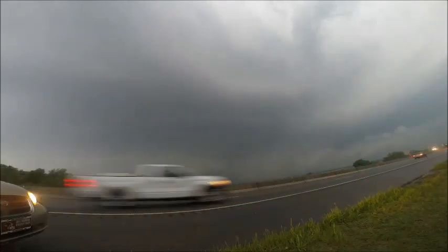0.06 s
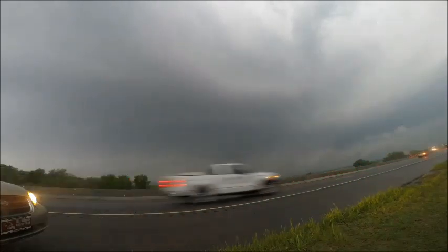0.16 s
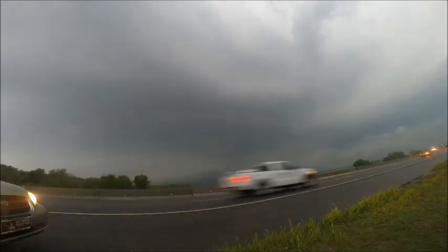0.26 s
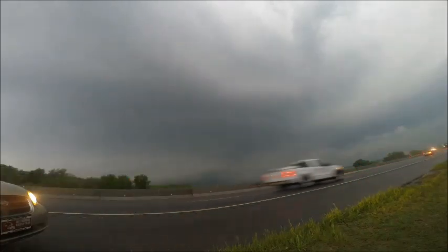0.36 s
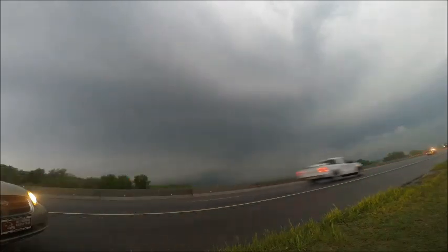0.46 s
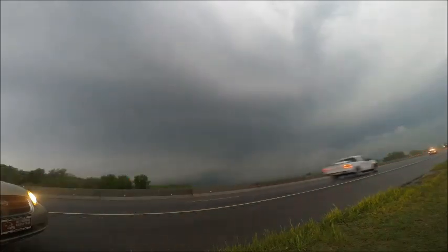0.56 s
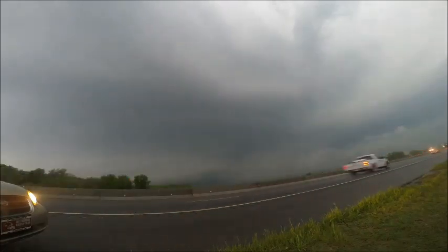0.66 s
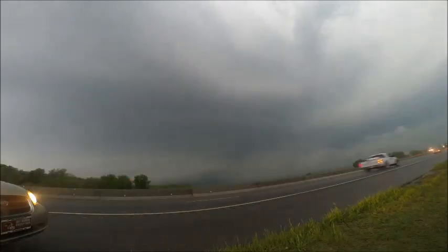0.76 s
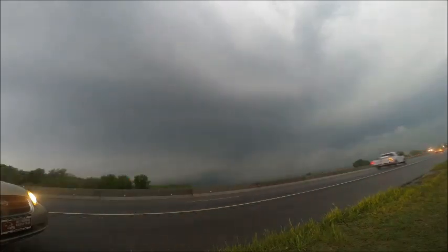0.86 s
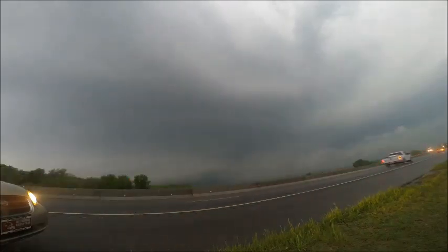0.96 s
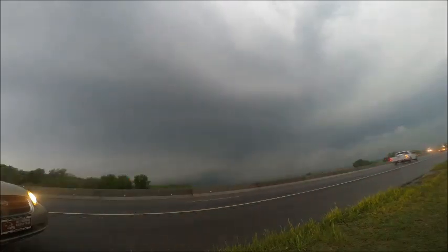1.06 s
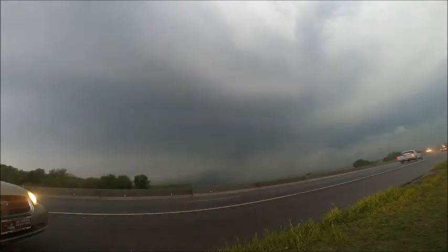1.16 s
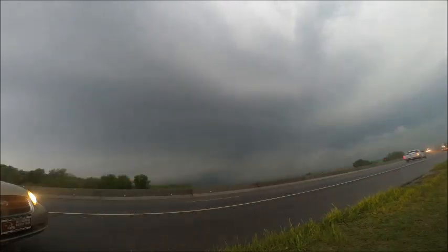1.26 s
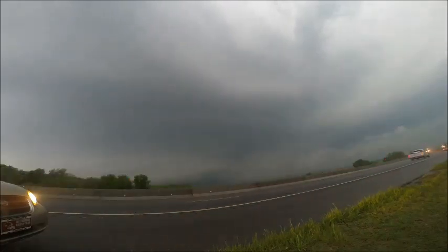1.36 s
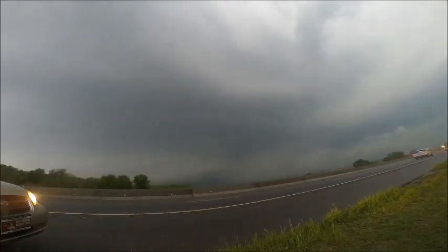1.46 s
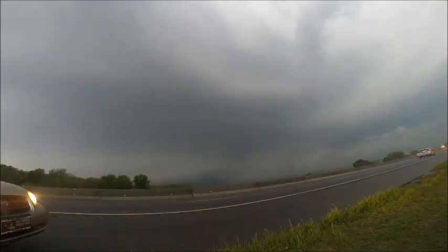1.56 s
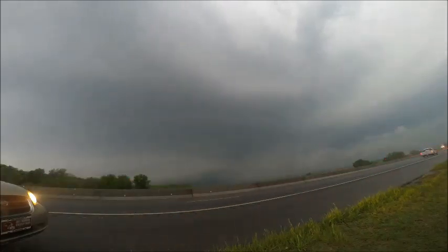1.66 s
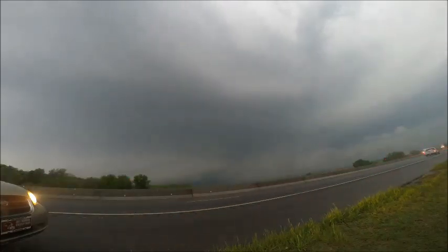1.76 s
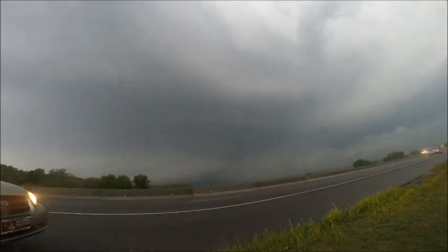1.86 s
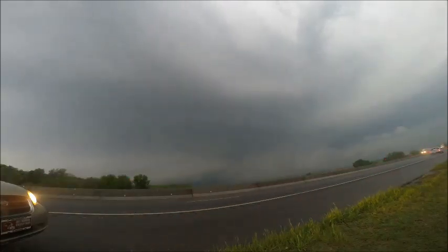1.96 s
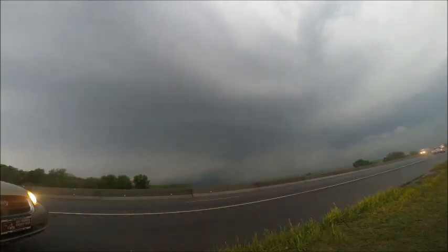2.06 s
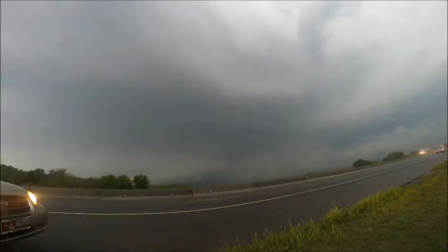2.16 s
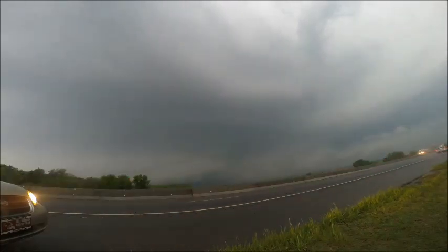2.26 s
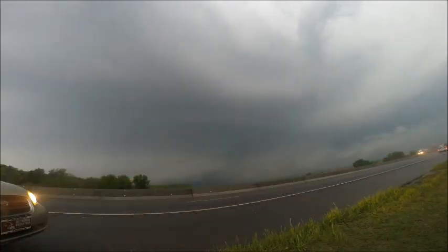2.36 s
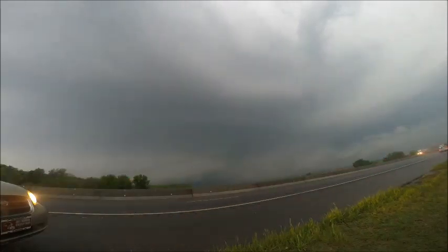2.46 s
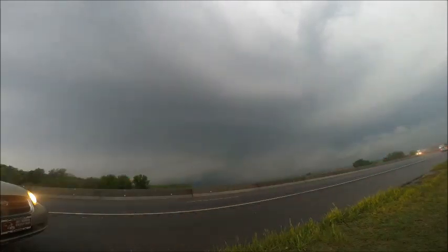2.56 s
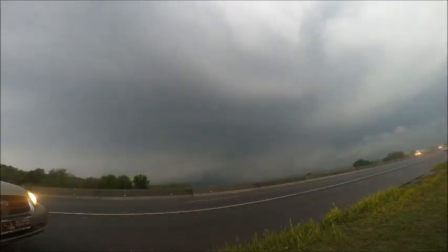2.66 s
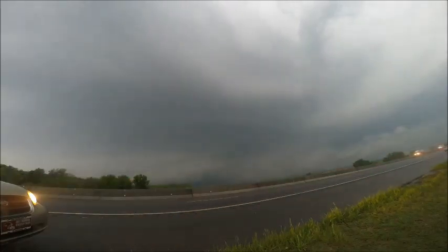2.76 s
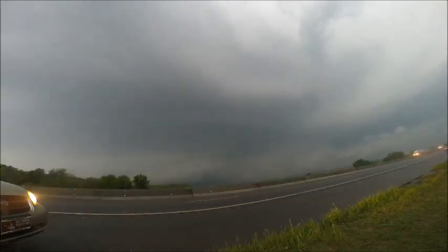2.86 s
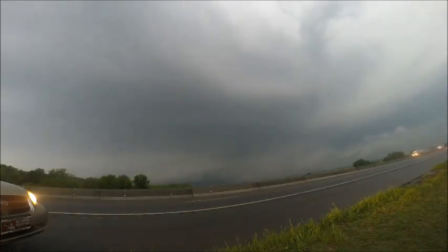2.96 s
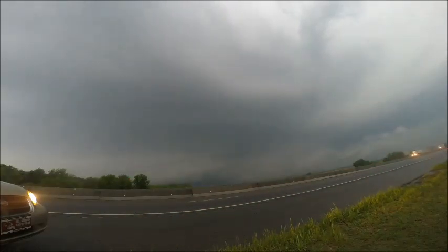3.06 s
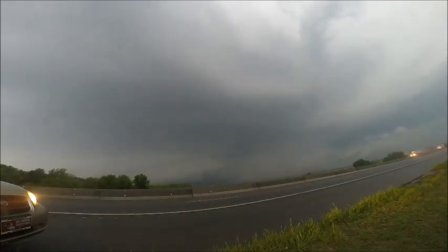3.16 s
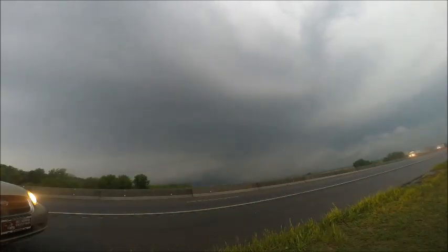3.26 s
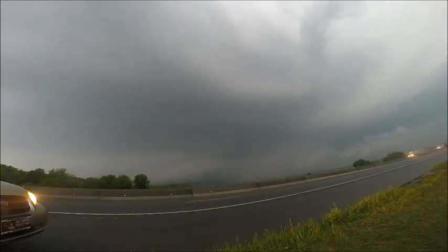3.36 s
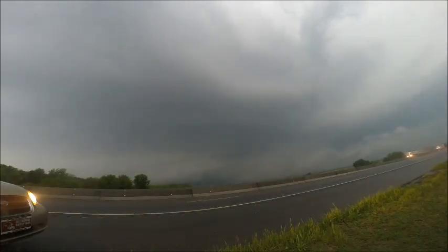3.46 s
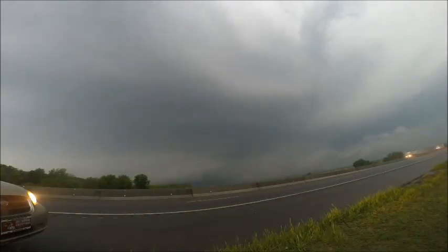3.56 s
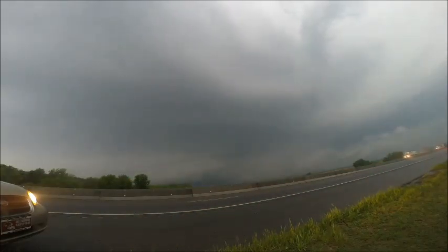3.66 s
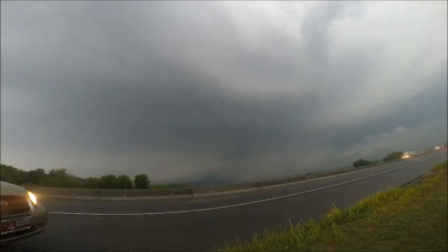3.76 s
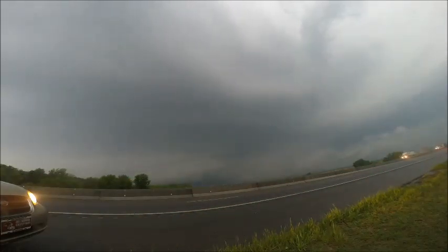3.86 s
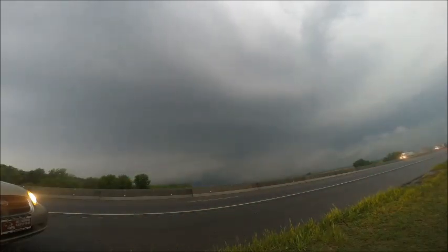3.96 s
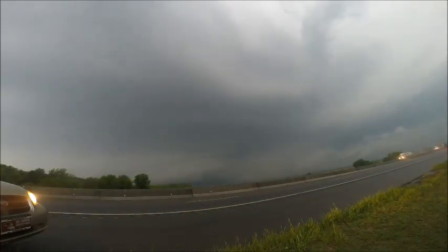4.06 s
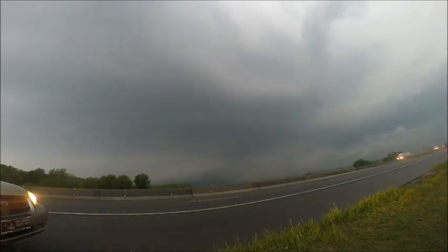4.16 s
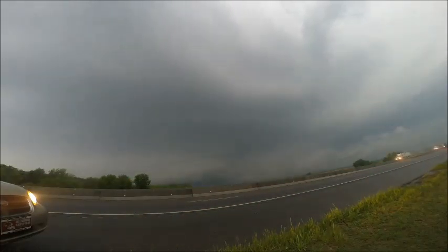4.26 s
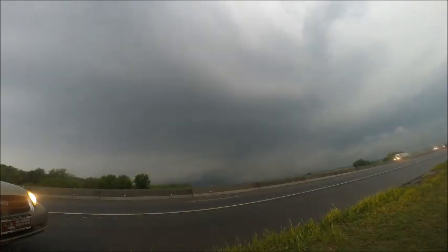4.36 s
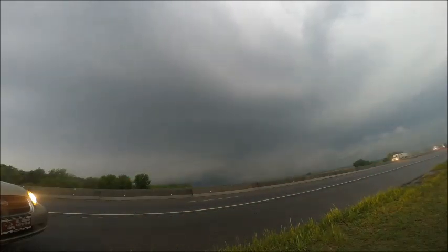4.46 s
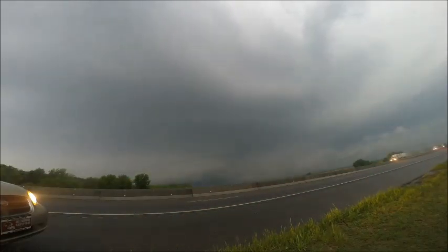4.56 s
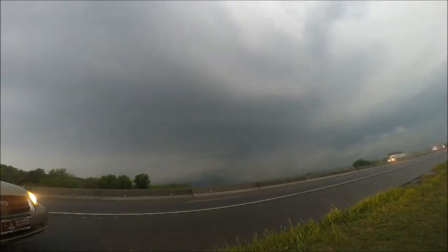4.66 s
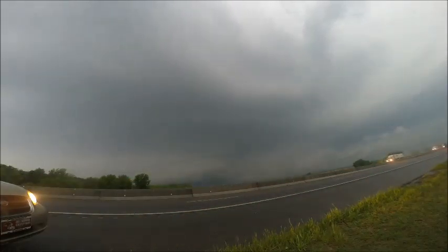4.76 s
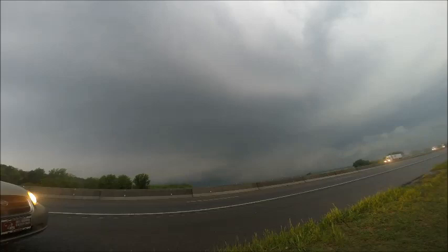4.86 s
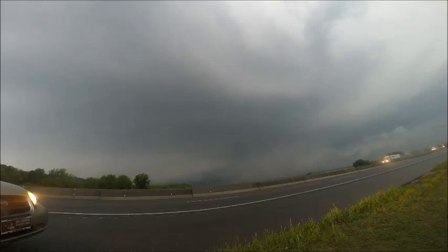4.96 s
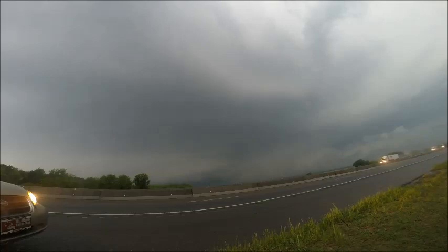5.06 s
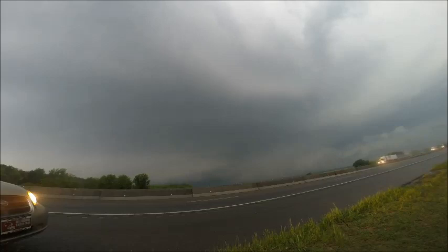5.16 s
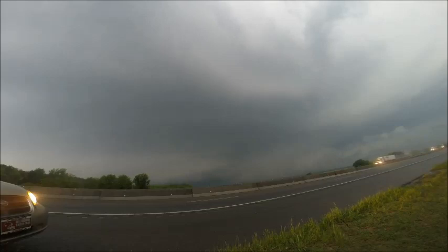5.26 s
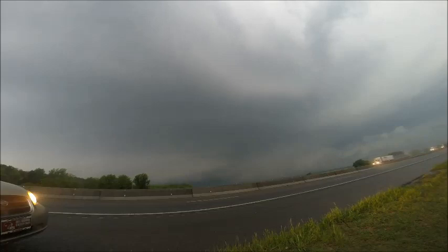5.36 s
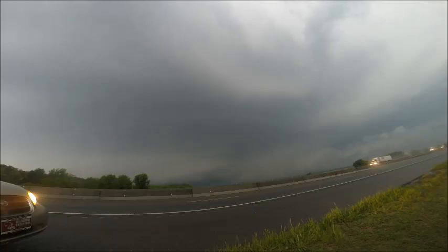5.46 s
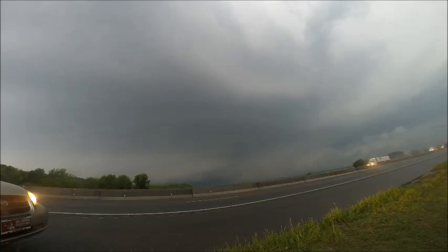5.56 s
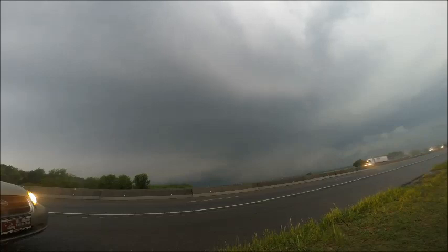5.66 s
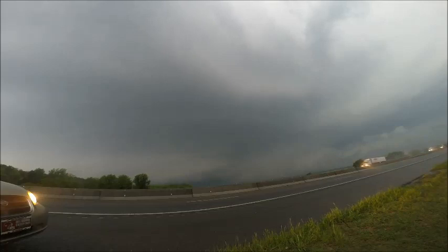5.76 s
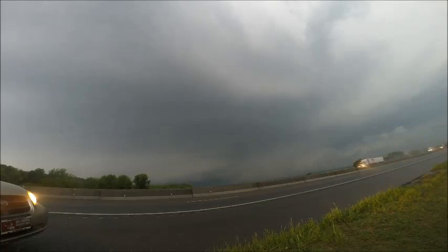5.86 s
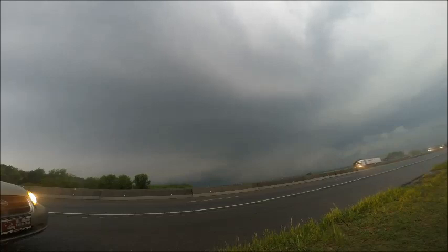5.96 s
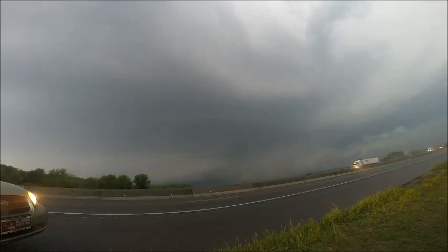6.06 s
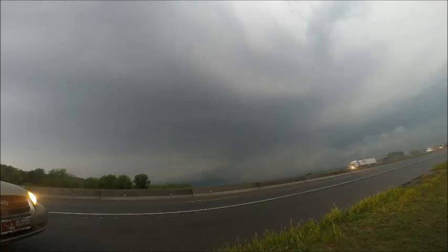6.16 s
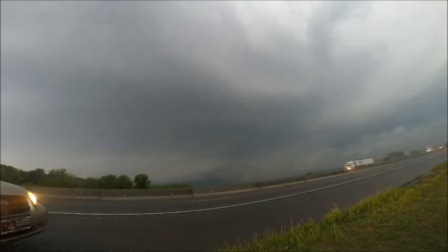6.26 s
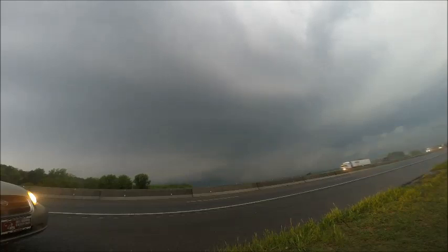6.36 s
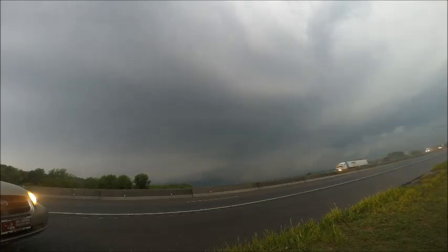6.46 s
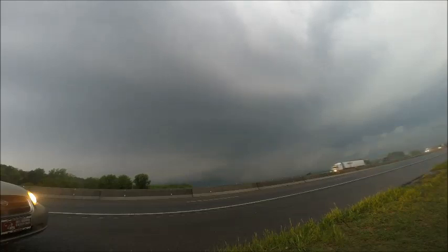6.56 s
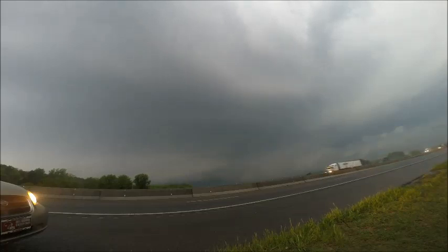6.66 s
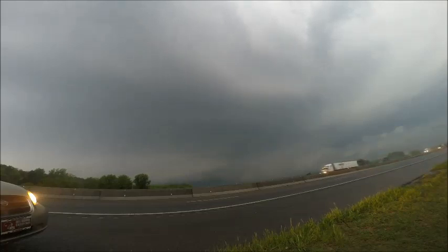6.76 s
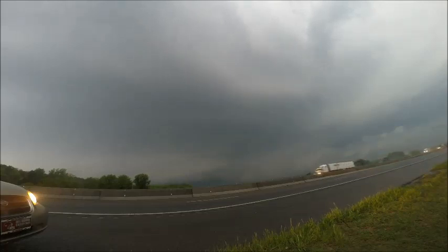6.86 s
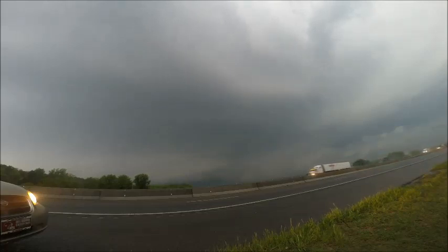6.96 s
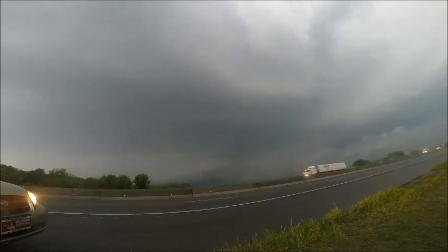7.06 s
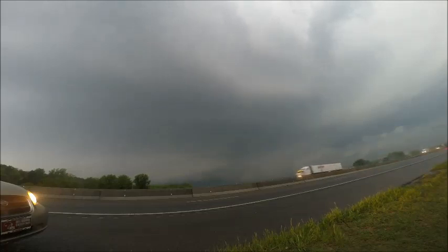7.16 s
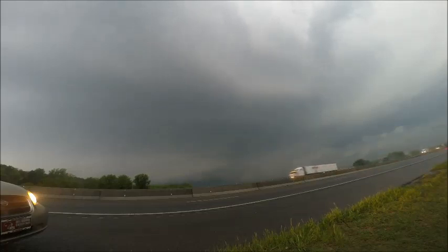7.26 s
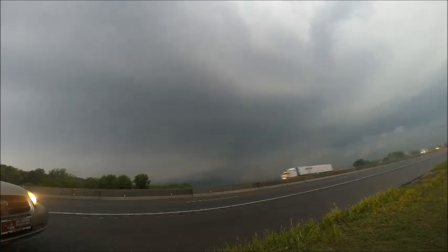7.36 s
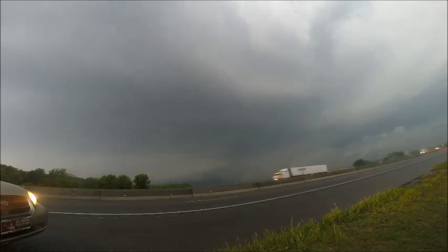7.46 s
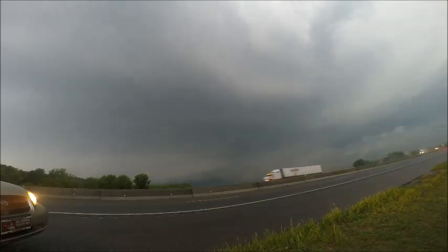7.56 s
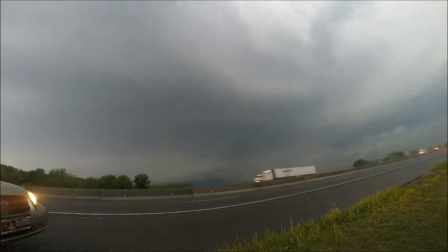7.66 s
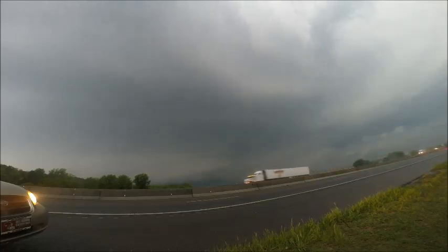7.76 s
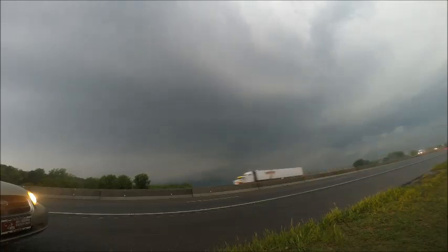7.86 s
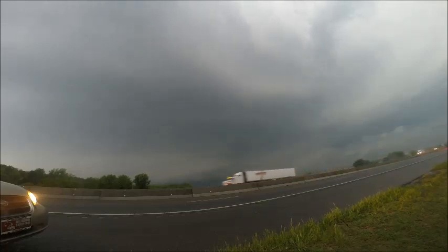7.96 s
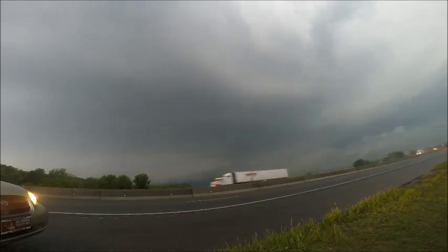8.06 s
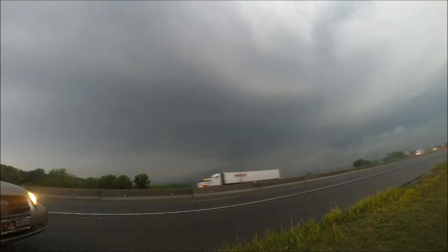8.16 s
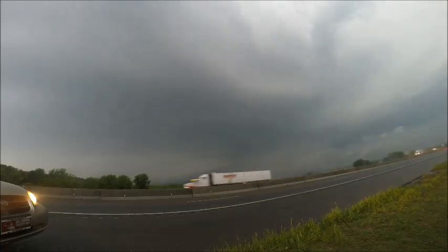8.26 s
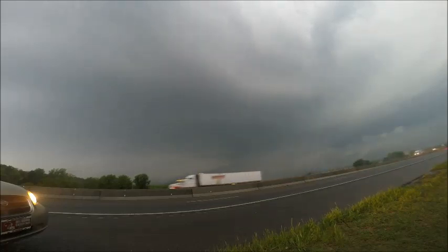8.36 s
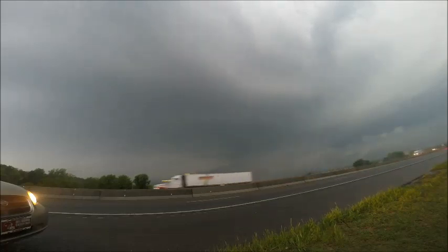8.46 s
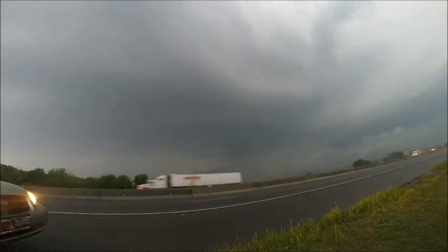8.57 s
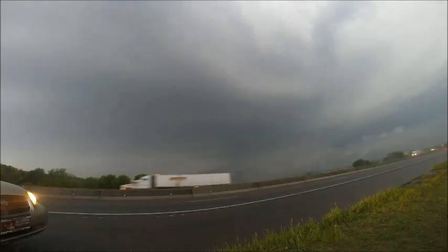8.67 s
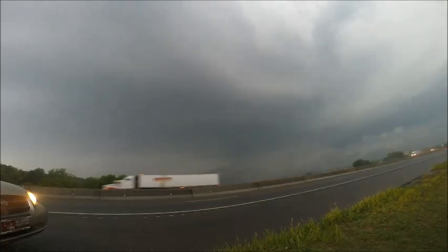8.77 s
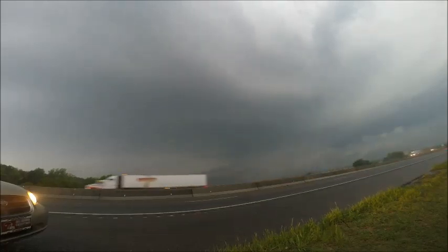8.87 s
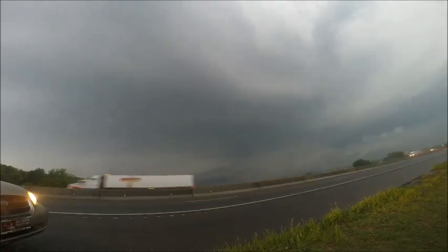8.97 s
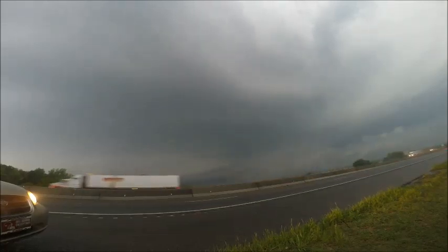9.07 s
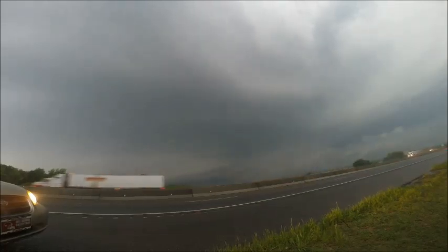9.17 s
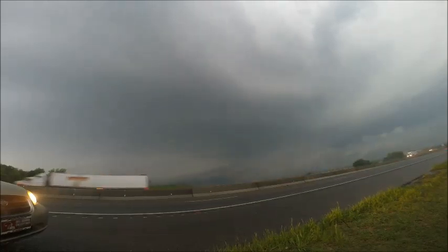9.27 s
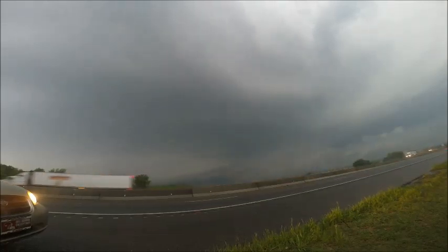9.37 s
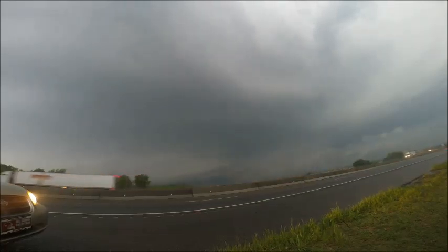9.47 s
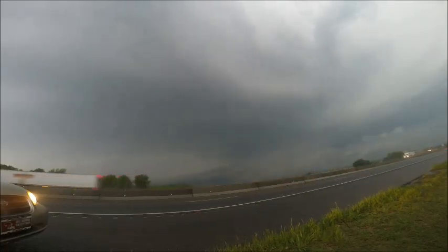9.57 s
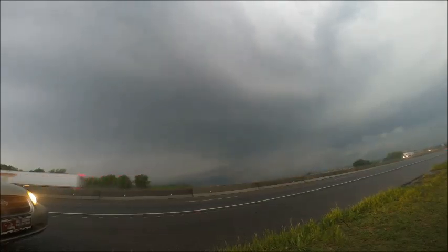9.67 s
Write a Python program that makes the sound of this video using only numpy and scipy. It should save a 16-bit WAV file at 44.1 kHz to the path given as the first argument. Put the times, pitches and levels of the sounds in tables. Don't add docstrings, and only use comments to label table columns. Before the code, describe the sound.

A pickup whooshes past on wet asphalt and fades into distant highway roar, wind booming on the microphone, then three knocks hit the camera housing.

```python
import sys
import numpy as np
from scipy import signal
from scipy.fft import rfft, irfft, next_fast_len
from scipy.io import wavfile
from scipy.ndimage import uniform_filter1d

SR = 44100
rng = np.random.default_rng(int(sys.argv[2]) if len(sys.argv) > 2 else 0)


def makeup_ratio(level_db):
    decades = np.asarray(level_db, float) / 20
    return 10 ** decades


def transcribe(signal):
    frames = np.atleast_2d(signal).T
    limited = np.clip(frames, -1, 1)
    pcm = np.round(limited * 32767).astype(np.int16)
    wavfile.write(sys.argv[1], SR, pcm)


N = 429093
TIME = np.arange(N) / SR
SIZE = next_fast_len(N)
HZ = np.maximum(np.fft.rfftfreq(SIZE, 1 / SR), 1)
TOP_HZ = 15000


# centre t/s, length t/s
HANDOVERS = [
    (.35, .3),
    (1.05, .3),
]


def road():
    turned, far = [np.clip(.5 + (TIME - s) / length, 0, 1) for s, length in HANDOVERS]
    side, rear = pickup_passing()
    pickup = np.sqrt(1 - turned) * side + np.sqrt(turned) * rear
    return np.sqrt(1 - far) * pickup + np.sqrt(far) * far_traffic() + tread_whine()


# f/Hz, level per Hz/dB
SIDE_TYRES = [(100, -4.5), (300, -7.5), (500, -3.5), (800, 8), (1500, -13), (2500, -7.5), (3400, -14.5),
              (5000, -11), (7000, -19), (10000, -32), (15500, -45)]
# f/Hz, level per Hz/dB
REAR_TYRES = [(100, -5), (300, -13), (500, -11), (800, -1), (1500, 0.5), (2500, 0), (3400, -11.5),
              (5000, -9), (7000, -11.5), (10000, -20.5), (15500, -46)]
# f/Hz, width f/Hz, far traffic level/dB, pickup's side level/dB
HOUSING = [(700, 159.4, 2, -0.5), (1197, 450, 10.5, 5.5), (1297, 16, -11, 8), (1490, 236, 18.5, 15.5),
           (1778, 203, 10.5, 0.5), (2010, 105, -5, -2), (2280, 215, 8.5, -6), (2480, 130, -5, -4),
           (2680, 200, -1, 4.5), (2986, 200, -8.5, 6), (3100, 70, 5.5, 2), (3190, 220, -1.5, -6),
           (3540, 180, 4.5, -6), (3980, 180, 4.5, -6), (4964, 980, 10, -0.5), (5690, 270, 5, -10),
           (5900, 200, -0.5, 10.5), (6640, 420, 4.5, -1), (8150, 1100, -1, -7), (9800, 860, 2.5, 5)]
# f/Hz, width f/Hz, level/dB
HOUSING_REAR = [(730, 78, 7.5), (1154, 131, 5.5), (1442, 230, 11), (1820, 90, 5.5), (1980, 130, -9.5),
                (2270, 230, 10.5), (2720, 130, 7), (3075, 85, 12), (3380, 300, 0), (3960, 130, 10.5),
                (4800, 400, 11), (5460, 720, 9), (6200, 280, -5), (6580, 340, 7.5), (8900, 900, -3),
                (10300, 1200, 3)]
SIDE_BALANCE = [-4, 3.5, -0.2, -4]
REAR_BALANCE = [-10, 4.5, -2.5, -1]


def pickup_passing():
    housing_side = [(hz, width, side_db) for hz, width, far_db, side_db in HOUSING]
    close_size = 65536
    side = tyres(pickup_levels(SIDE_BALANCE), SIDE_TYRES, housing_side, patchy_db=.7, size=close_size)
    rear = tyres(pickup_levels(REAR_BALANCE), REAR_TYRES, HOUSING_REAR, patchy_db=.45, size=close_size)
    return side, rear


# t/s, tyre level/dB
PICKUP = [(0.0, -44), (0.12, -38.5), (0.24, -41), (0.4, -38.5), (0.5, -39.5), (0.62, -40.5), (0.8, -43.5),
          (0.95, -47), (1.2, -48)]
DULLING = [8.5, -5.5, 5.5, -11]


def pickup_levels(balance_db):
    level_db, = in_time(PICKUP)
    draws_away_s = .5
    away = np.clip(TIME - draws_away_s, 0, 1)
    return [level_db + db + change * away for db, change in zip(balance_db, DULLING)]


# f/Hz, level per Hz/dB
FAR_TYRES = [(100, 9), (200, 9), (450, -3), (800, -7), (1500, -20.5), (2300, -9.5), (3000, -3), (3400, -19),
             (5000, -22), (7000, -26), (10000, -34), (15500, -49)]


def far_traffic():
    housing_far = [(hz, width, far_db) for hz, width, far_db, side_db in HOUSING]
    return tyres(traffic_levels(), FAR_TYRES, housing_far, patchy_db=0.68, size=SIZE)


ROAD_HZ = [300, 1200, 2600, 5000]
ROAR = [-55, -60, -61, -65]
ROAR_RISE = [0.62, .05, .05, 0.12]
RECEDING = [-58.5, -41, -51.5, -55]
AIR_LOSS = [3, 0.97, 4.6, 8.2]
# nearest t/s, half length t/s, level/dB, centre of hiss f/Hz
PASSES = [(1.2, 0.21, -46, 1310), (2.347, 0.41, -46.5, 1190), (3.006, 0.24, -43.5, 1260),
          (3.8, 0.26, -62, 300), (4.8, 0.52, -50, 1280), (5.33, 0.46, -54.5, 2400), (6.4, 0.68, -52, 1300),
          (6.35, 0.67, -58, 2670), (6.75, 0.43, -61, 4600), (7.8, 0.16, -58.5, 1350),
          (9.4, 0.2, -53.5, 900), (9.7, .25, -56.5, 2600)]


def traffic_levels():
    spread_db, alongside_s = 6, .3
    fall_db, width_db = 19.5, 20.5
    t = TIME[::64]
    gone = np.maximum(t, .5)
    spread = spread_db * np.log10((gone - alongside_s) / (1 - alongside_s))
    out = []
    for hz, roar, rise, tail, loss in zip(ROAD_HZ, ROAR, ROAR_RISE, RECEDING, AIR_LOSS):
        power = makeup_ratio(2 * (roar + rise * (t - 5)))
        power += makeup_ratio(2 * (tail - loss * (gone - 1) - spread))
        for s, half, db, centre_hz in PASSES:
            off_centre_db = width_db * np.log2(hz / centre_hz) ** 2
            distance_db = fall_db * np.log10(1 + ((t - s) / half) ** 2)
            power += makeup_ratio(2 * (db - off_centre_db - distance_db))
        out.append(np.interp(TIME, t, 10 * np.log10(power)))
    return out


# t/s, f/Hz, level/dB
WHINE = [(4.9, 591, -75), (5.35, 585, -64.5), (5.65, 590, -64.5), (6.05, 586, -56.5), (6.35, 586, -61.5),
         (6.5, 588, -70), (6.8, 568, -62), (6.95, 566, -82)]
# t/s, f/Hz, level/dB
COARSE_TREAD = [(4.9, 404, -78), (5.3, 404, -68), (6.3, 400, -66), (7.0, 398, -70), (7.2, 397, -78)]


def tread_whine():
    out = np.zeros(N)
    for track, waver_db, rate in [(WHINE, 2.2, 5.0), (COARSE_TREAD, 2.0, 3.0)]:
        hz, level_db = in_time(track)
        tone = np.sin(2 * np.pi * np.cumsum(hz) / SR)
        out += np.sqrt(2) * makeup_ratio(level_db + waver_db * drift(rate)) * tone
    return out


# low edge f/Hz, high edge f/Hz
ROAD_BANDS = [(150, 600), (600, 1950), (1950, 3350), (3350, 15000)]


def tyres(levels, spectrum, housing, patchy_db, size):
    freq = np.maximum(np.fft.rfftfreq(size, 1 / SR), 1)
    cavity_db = resonances(freq, housing, lambda db: db)
    colour = makeup_ratio(at_hz(spectrum, freq) + cavity_db) * (freq > 100) * (freq < TOP_HZ)
    share = [np.sum(colour[(freq > lo) & (freq < hi)] ** 2) / len(freq) for lo, hi in ROAD_BANDS]
    lift_db = [db - 10 * np.log10(s) for db, s in zip(levels, share)]
    noise = rfft(rng.standard_normal(size)) * colour
    octave, centres = np.log2(freq), np.log2(ROAD_HZ)
    together, out = drift(6.8), np.zeros(N)
    for mid in np.arange(6.5, 14.1, .5):
        place = np.interp(mid, centres, range(4))
        gain_db = sum(max(0, 1 - abs(place - k)) * lift_db[k][:size] for k in range(4))
        flicker_db = patchy_db * (1.23 * together + drift(25.0))[:size]
        piece = irfft(noise * np.maximum(0, 1 - 2 * abs(octave - mid)), size)[:N]
        out[:size] += piece * makeup_ratio(gain_db + flicker_db)
    return out


# t/s, crack level/dB, crack length t/s, ring level/dB, signed push on the mount, push length t/s
KNOCKS = [
    (8.3617, -23, .004, -44, 0.055, 0.0015),
    (8.4688, -19.5, 0.0055, -33, 0.24, 0.0034),
    (8.9249, -1, 0.00588, -14.5, -0.22, 0.0004),
]
# f/Hz, level/dB, t60 t/s
HELD_SHELL = [(905, -23, 0.013), (1430, -3, 0.032), (1800, 4, 0.017), (2320, 0, 0.018), (2870, -7, 0.02),
              (4930, -22, .012), (5440, -30, .012)]
# f/Hz, level/dB, t60 t/s
FREE_SHELL = [(970, -35, 0.035), (1063, -8, 0.055), (1136, -0.5, 0.051), (1233, -3, 0.045),
              (1440, -7, 0.025), (1990, 4.5, 0.019), (1842, -2, .16), (2130, -13, 0.013),
              (2400, -17, 0.024), (3020, -33, .02), (3600, -25, 0.0061), (4070, -15, 0.018),
              (4790, -6, 0.0067), (5600, -4.5, 0.007)]
# f/Hz, level/dB, t60 t/s
BODY = [(373, -18, 0.025), (590, -8, .03), (800, -23.5, 0.018)]
# f/Hz, level/dB, t60 t/s
MOUNT = [(58, -2, .14), (80, -5, .14), (130, -14, .08), (175, -9, .1), (235, -12, .07)]
# share of its length, level/dB
BOUNCES = [
    (.02, -0.5),
    (.42, -2.5),
    (.78, 0),
]


def knocks():
    out, after = np.zeros(N), np.arange(SR // 2) / SR
    dead_hz, dead_width_hz = 1620, 160
    notch = signal.iirnotch(dead_hz, dead_hz / dead_width_hz, fs=SR)
    shells = [HELD_SHELL, HELD_SHELL, FREE_SHELL]
    for (s, crack_db, length, ring_db, push, push_s), modes in zip(KNOCKS, shells):
        rattle = np.exp(-(after / length) ** 4)
        rattle += 0.78 * np.exp(-after / 0.00058) + 0.12 * np.exp(-after / 0.013)
        raw = rng.standard_normal(len(after)) * rattle + 1e-18
        contact = band(raw, 900, 6500 * makeup_ratio(.09 * crack_db))
        short_modes = [(hz, db, .005) for hz, db, t60 in modes]
        crack = ring(contact, short_modes) + .5 * contact + 0.032 * raw

        blows = np.zeros(len(after))
        for share, db in BOUNCES:
            blows[round(share * length * SR)] += makeup_ratio(db)
        blows = band(-blows + 1e-18, 800, 6500)
        sound = makeup_ratio(crack_db) * crack / np.abs(crack).max() + makeup_ratio(ring_db) * ring(blows, modes)
        sound = signal.lfilter(*notch, sound)

        edge = signal.unit_impulse(len(after), round(BOUNCES[1][0] * length * SR)) + 1e-18
        snap = makeup_ratio(-15 + 1.8 * crack_db) * band(edge, 7000, TOP_HZ)
        sound += makeup_ratio(ring_db) * ring(edge, BODY) + snap
        sound += push * ring(np.exp(-after / push_s) / (push_s * SR), MOUNT)
        at = round(s * SR)
        out[at:at + len(after)] += sound[:N - at]
    return out


# t/s, buffeting level/dB
GUST = [(0, -50), (.3, -41), (.9, -41.5), (1.25, -37), (1.75, -42.5), (2.1, -35), (2.55, -43.5),
        (3.5, -39.5), (4.1, -43.5), (4.7, -39.5), (5.25, -42.5), (5.8, -40.5), (6.4, -43.5), (7.3, -35),
        (7.65, -38.5), (7.9, -33.5), (8.25, -38.5), (9.73, -38.5)]
# f/Hz, level per Hz/dB
BUFFET = [(12, -15), (22, 1), (40, -3.5), (60, -23), (120, -26), (250, -51), (500, -77)]
# t/s, half length t/s, level over the wind/dB
EDDIES = [(.18, 0.037, 9), (.63, .05, -3), (1.26, 0.042, 0), (2.97, 0.047, 3), (3.33, 0.054, 0),
          (3.66, 0.059, 0), (4.41, 0.021, 6.5), (4.95, 0.045, 0), (5.67, 0.019, 7.5), (6.39, 0.041, -2),
          (7.11, 0.036, 1.5), (7.88, 0.066, -0.5), (8.58, .08, 4), (8.82, .05, -7), (9.18, 0.069, 6.5),
          (9.53, 0.062, 3)]
# f/Hz, width f/Hz, level/dB
LOW_MODE = [(58.5, 10, 0)]
# f/Hz, width f/Hz, level/dB
UPPER_MODES = [(80, 25, 9.5), (109.2, 14, -2.5)]
# t/s, half length t/s, level/dB
ROCKS = [(.05, 0.12, -44.5), (.43, 0.095, -47.5), (.85, 0.067, -35), (1.45, 0.23, -46), (1.71, 0.042, -41),
         (1.9, 0.084, -39), (2.2, 0.072, -40.5), (2.44, 0.037, -36), (2.57, 0.077, -41), (2.97, 0.14, -40),
         (3.25, .07, -38), (3.53, 0.16, -42.5), (3.72, 0.11, -43), (4.08, 0.17, -40), (4.52, 0.072, -48),
         (5.13, 0.067, -47.5), (5.42, 0.073, -46.5), (6.1, 0.087, -47), (6.55, 0.1, -48),
         (6.85, 0.066, -44), (7.28, 0.089, -43.5), (7.48, 0.036, -34), (7.76, 0.21, -35),
         (8.2, 0.074, -34.5), (8.52, 0.091, -31.5), (8.74, 0.059, -29.5), (9.01, 0.067, -19),
         (9.27, 0.083, -24), (9.47, 0.04, -33), (9.64, 0.06, -31.5)]
# t/s, half length t/s, level/dB
JOLTS = [(.75, 0.1, -53), (1.6, 0.055, -46), (2.27, 0.15, -48), (2.65, 0.14, -48.5), (3.24, 0.084, -52),
         (3.75, 0.14, -47.5), (4.18, 0.1, -44.5), (5.58, 0.03, -47), (6.5, 0.046, -53), (6.9, 0.13, -45),
         (7.38, .05, -43.5), (7.56, .05, -45), (7.92, .05, -42), (8.2, .07, -44.5), (8.42, 0.13, -40),
         (8.63, 0.057, -45), (8.96, 0.054, -26.5), (9.31, 0.062, -28.5), (9.5, 0.068, -34.5)]


def wind():
    gust_db, = in_time(GUST)
    swing_db = gust_db - gust_db.mean()
    buffet = coloured(makeup_ratio(at_hz(BUFFET, HZ)) * (HZ > 12) * (HZ < 500))
    out = buffet * makeup_ratio(gust_db) * np.sqrt(.5 + swells(EDDIES))
    for modes, shakes, rest_db, follows in [(LOW_MODE, ROCKS, -55, .4), (UPPER_MODES, JOLTS, -57, 0.37)]:
        power = makeup_ratio(2 * (rest_db + follows * swing_db)) + swells(shakes)
        out += np.sqrt(power) * boom(modes)
    return out


def boom(modes):
    x = coloured(resonances(HZ, modes, makeup_ratio))
    return rms_one(x / (uniform_filter1d(x ** 2, size=2600) + .15) ** .42)


# t/s, peak level/dB, length t/s, centre f/Hz
TICKS = [
    (3.616, -51, 0.0023, 6000),
    (7.41, -51, .008, 6000),
    (7.418, -54, .007, 7500),
    (7.41, -64, .012, 2900),
    (8.377, -40, .008, 2800),
    (8.488, -43, .014, 3000),
    (8.599, -41, .003, 3000),
    (8.63, -52, .012, 5500),
    (9.465, -61, .012, 11000),
    (9.5, -61, 0.0065, 7000),
]


def ticks():
    out, after = np.zeros(N), np.arange(1500) / SR
    for s, peak_db, length, hz in TICKS:
        scuff = rng.standard_normal(1500) * np.exp(-(after / length) ** 2)
        out[round(s * SR):][:1500] += makeup_ratio(peak_db) * band(scuff, hz / 1.5, hz * 1.22)
    return out


# multiple of its base f, rms level/dB
ELECTRONICS = [(1, -86), (2, -80), (3, -87), (4, -81.5), (5, -84.5)]


def preamp_noise():
    circuit_hz, pictures_per_s = 2926.1, 29.97
    since_picture = TIME % (1 / pictures_per_s)
    hiss = makeup_ratio(-72) * coloured(1 / (1 + (HZ / 12000) ** 2) * (HZ < TOP_HZ))
    return hiss + sum(np.sqrt(2) * makeup_ratio(db) * np.sin(2 * np.pi * k * circuit_hz * since_picture)
                      for k, db in ELECTRONICS)


def gain_control(x):
    limit_db, duck_share, recover_db_s, attack_s = -14, 0.57, 28, 0.012
    over_db = np.maximum(20 * np.log10(np.abs(x[0]) + 1e-9) - limit_db, 0)
    held_db = np.maximum.accumulate(over_db + recover_db_s * TIME) - recover_db_s * TIME
    lag = np.exp(-1 / (attack_s * SR))
    duck_db = duck_share * signal.lfilter([1 - lag], [1, -lag], held_db)
    return x * makeup_ratio(-duck_db)


def rms_one(x):
    return x / np.sqrt(np.mean(x ** 2) + 1e-20)


def in_time(rows):
    s, *columns = np.transpose(rows)
    return [np.interp(TIME, s, c) for c in columns]


def at_hz(points, hz):
    point_hz, level_db = np.transpose(points)
    return np.interp(np.log(hz), np.log(point_hz), level_db)


def resonances(freq, modes, scale):
    return sum(scale(db) / (1 + (2 * (freq - hz) / width) ** 2) for hz, width, db in modes)


def drift(rate):
    r = np.exp(-128 * np.pi * rate / SR)
    slow = signal.lfilter([1], [1, -2 * r, r * r], rng.standard_normal(N // 64 + 2002))[2000:]
    return np.interp(np.arange(N) / 64, np.arange(len(slow)), rms_one(slow - slow.mean()))


def coloured(gain):
    return rms_one(irfft(rfft(rng.standard_normal(SIZE)) * gain, SIZE)[:N])


def band(x, low_hz, high_hz):
    return signal.sosfilt(signal.butter(2, [low_hz, high_hz], "band", fs=SR, output="sos"), x)


def ring(push, modes):
    out = 0
    for hz, level_db, t60 in modes:
        r, w = makeup_ratio(-60 / (t60 * SR)), 2 * np.pi * hz / SR
        out = out + makeup_ratio(level_db) * signal.lfilter([0, np.sin(w)], [1, -2 * r * np.cos(w), r * r], push)
    return out


def swells(rows):
    power = np.zeros(N)
    for s, half, db in rows:
        a, b = max(int((s - 3 * half) * SR), 0), int((s + 3 * half) * SR)
        power[a:b] += makeup_ratio(2 * db) * np.exp(-((TIME[a:b] - s) / half) ** 2)
    return power


def scene():
    return (road() + knocks() + wind() + ticks())[None]


def roll_off(x):
    return signal.sosfilt(signal.butter(12, 15970, fs=SR, output="sos"), x)


def record(dry):
    mix = np.clip(gain_control(dry + preamp_noise()), -1, 1)
    return roll_off(mix)


dry = scene()
out = record(dry)
transcribe(out)
```